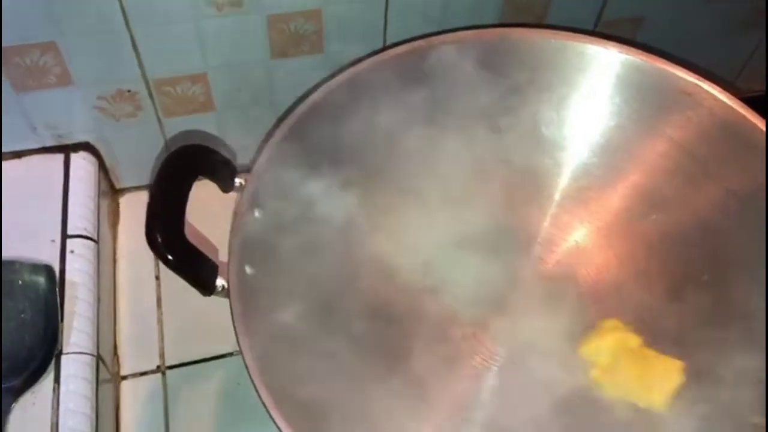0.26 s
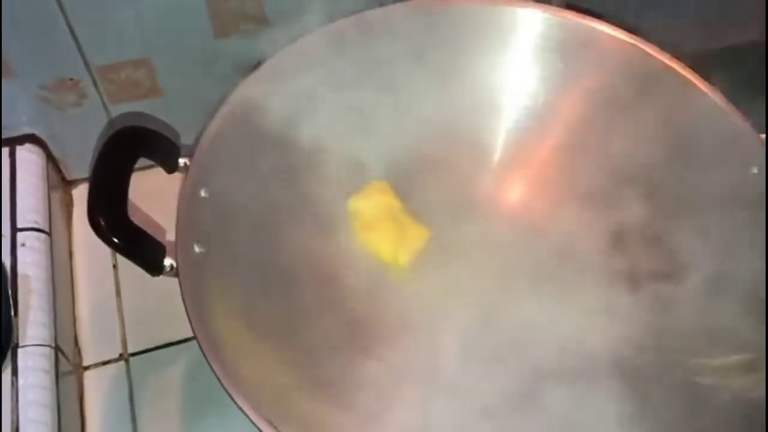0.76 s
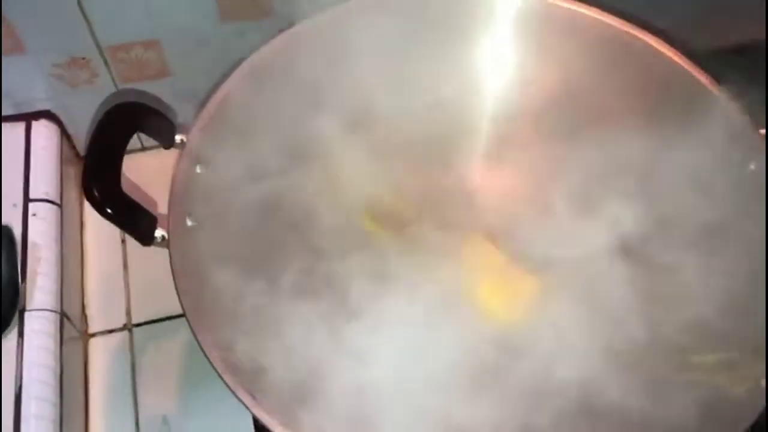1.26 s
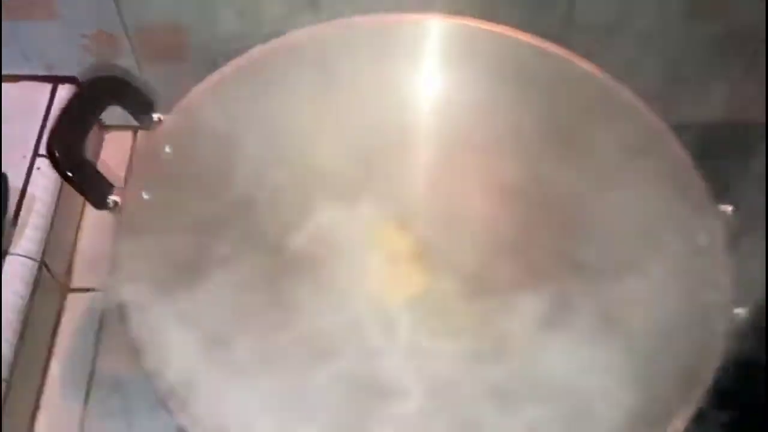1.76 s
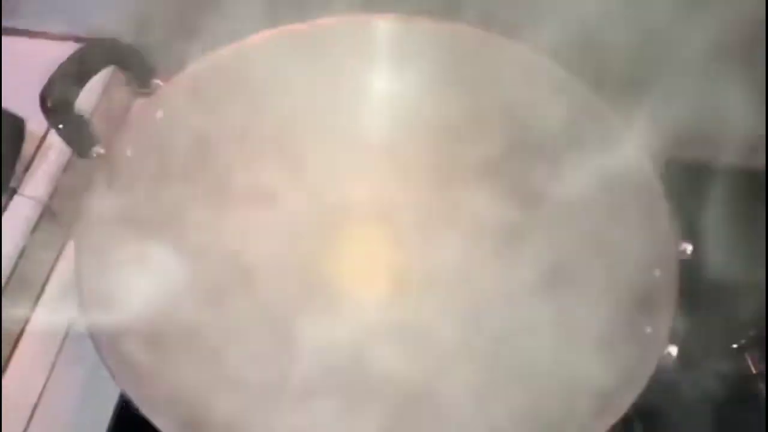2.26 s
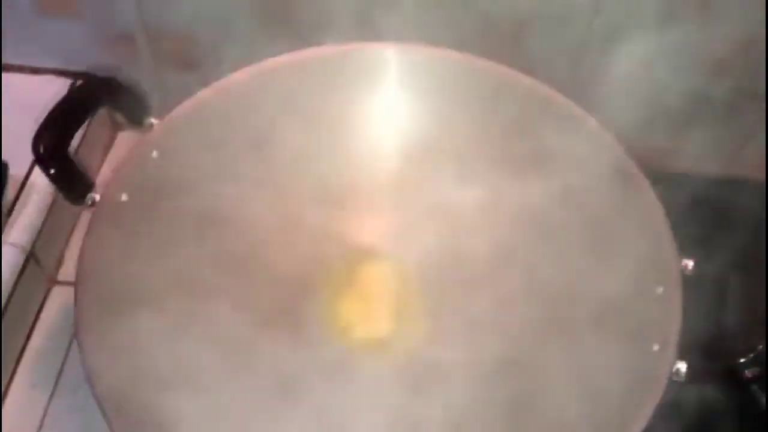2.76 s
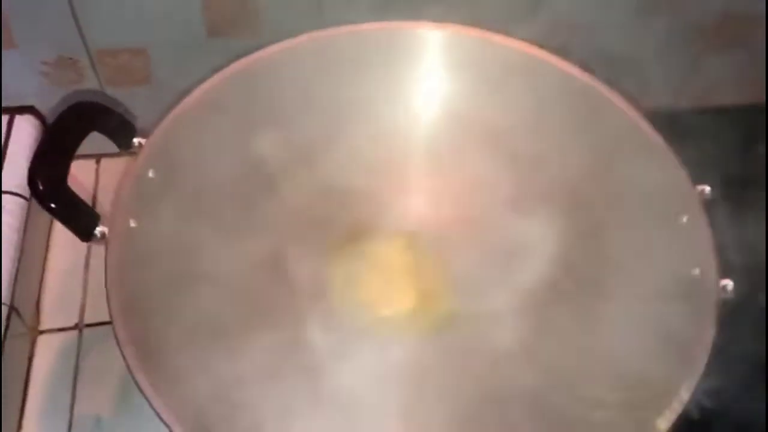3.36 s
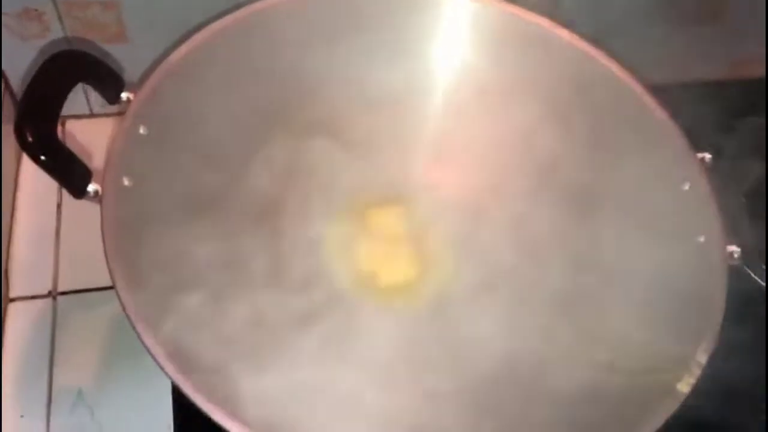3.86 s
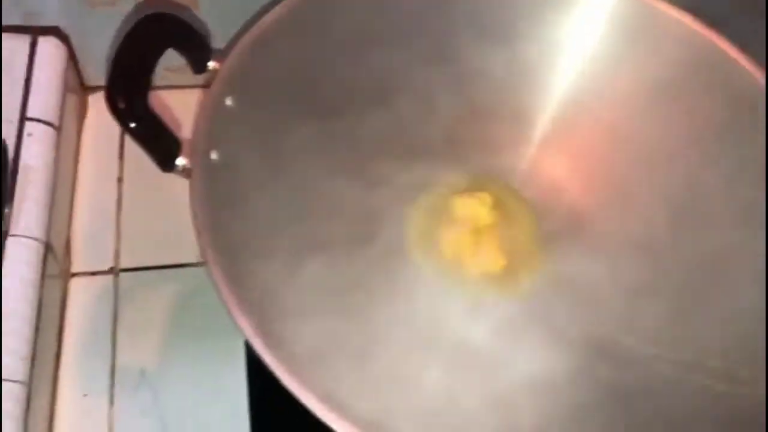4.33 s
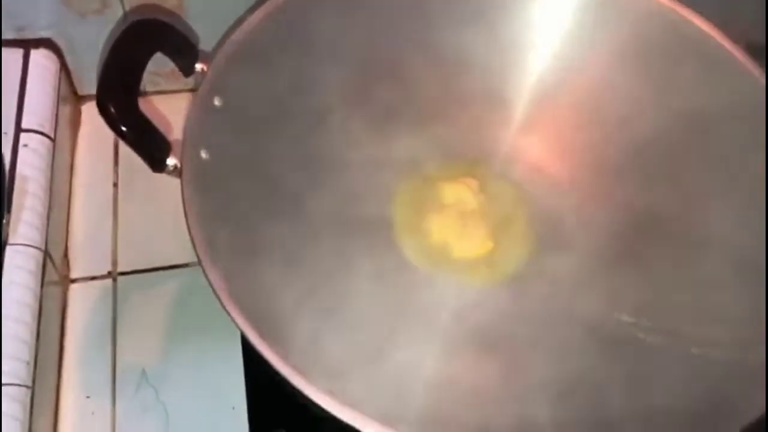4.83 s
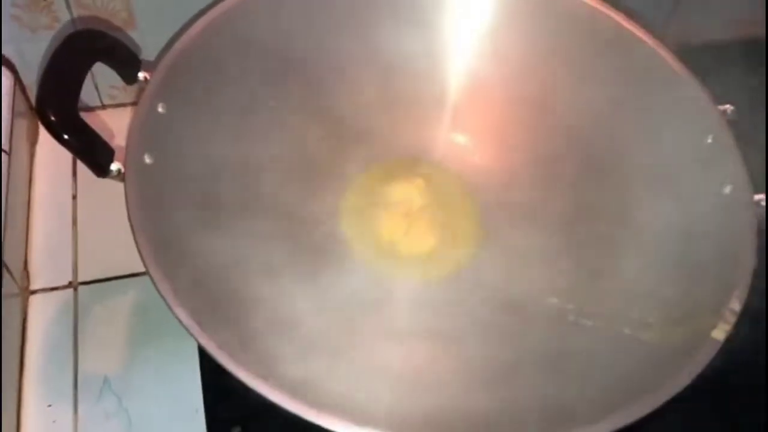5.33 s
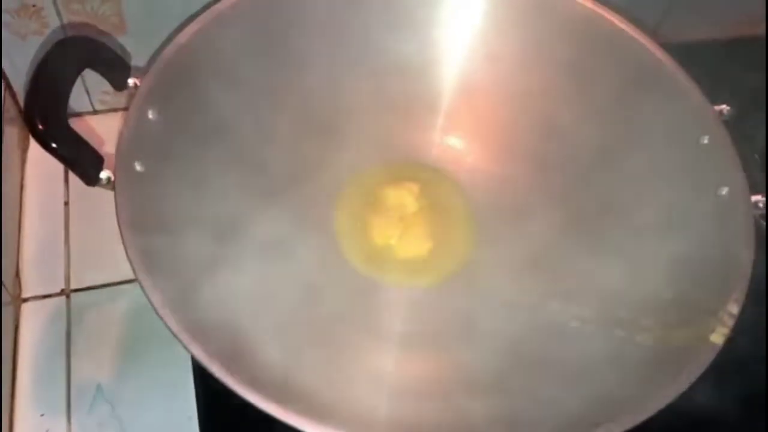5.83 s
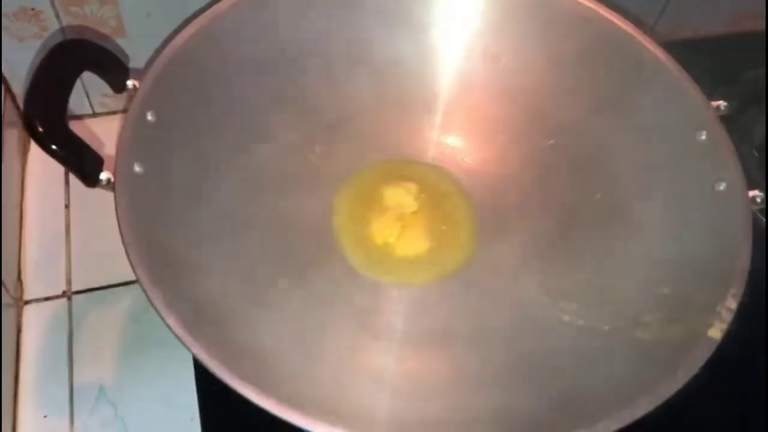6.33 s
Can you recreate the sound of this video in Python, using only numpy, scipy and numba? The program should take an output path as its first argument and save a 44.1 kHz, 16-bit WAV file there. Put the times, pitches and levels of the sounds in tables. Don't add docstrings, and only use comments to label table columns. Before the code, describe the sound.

A lump of butter hits a scorching steel wok and sizzles loudly at once, bright and dense with tiny steam bubbles. It slides with a fuller, lower sputter, then single droplets spit above it. Past two seconds the wok knocks once on its stand. The sizzle grows darker as the butter pools. A faint extractor hum sits underneath; close phone microphone, small tiled kitchen.

```python
import sys
import numpy as np
from scipy import signal
from scipy.fft import rfft, irfft
from scipy.io import wavfile
from scipy.ndimage import uniform_filter1d, map_coordinates
from numba import njit

SR = 44100
rng = np.random.default_rng(int(sys.argv[2]) if len(sys.argv) > 2 else 0)


def volts(x):
    e = np.asarray(x, float) / 20
    return 10 ** e


def dump_mix(stems):
    frames = np.atleast_2d(stems).T
    limited = np.clip(frames, -1, 1)
    pcm = np.round(limited * 32767).astype(np.int16)
    wavfile.write(sys.argv[1], SR, pcm)


N = 290844
TIME = np.arange(N) / SR

# pitch in Hz, level in dB, decay time t60 in seconds.
WOK_MODES = [(320, -15, .08), (420, -14, .08), (554, -11, .05), (728, -9, .04), (915, 1, .08),
             (1060, 0, .06), (1300, -7, .04), (1420, -2, .05), (1630, 0, .045), (1830, -2, .055),
             (2190, -5, .04)]


def level(x, db):
    return x * volts(db) / np.sqrt(np.mean(x ** 2))


def colour(x, points):
    hz, db = np.transpose(points)
    bins = np.maximum(np.arange(N // 2 + 1) * SR / N, 1)
    gain = volts(np.interp(np.log(bins), np.log(hz), db))
    return irfft(rfft(x) * gain, N)


def walk(rate):
    hold = int(SR / rate)
    steps = np.repeat(rng.standard_normal(N // hold + 1), hold)
    x = uniform_filter1d(uniform_filter1d(steps, hold), hold)[:N]
    return x / x.std()


def bell(x):
    return np.exp(-x ** 2)


@njit
def rings(start, hz, t60, glide, size, n):
    out = np.zeros(n)
    for k in range(len(start)):
        span = int(t60[k] * SR) + 2
        pole = np.exp(2j * np.pi * hz[k] / SR - np.log(1000) / span)
        turn = np.exp(2j * np.pi * hz[k] / SR * glide[k] / span)
        z = size[k] + 0j
        for i in range(start[k], min(start[k] + span, n)):
            out[i] += z.imag
            z *= pole
            pole *= turn
    return out


def boiling_db(s, hz):
    # time in seconds, vigour of boiling in dB, depth of the pool as dB of its fat bubbles.
    boil = [(0, -6, -3), (.1, -2.5, -2), (.26, -0.5, -1), (.5, -2, -3.5), (.75, 1.5, -6.5), (1.0, -1.5, -1),
            (1.45, 0.3, -4.5), (1.8, -1.5, -3.5), (2.55, 2.6, -4.5), (2.8, 0.65, 0), (3.2, 1.4, -0.8),
            (3.8, -1, 3.5), (4.0, 2.5, 0.5), (5.15, 0.8, 1.9), (5.5, 0, 1.5), (5.8, -1, 4.5),
            (6.15, 1.5, 2), (6.6, 0.6, 3)]
    # middle in seconds, length in seconds, pitch in Hz, level in dB.
    flares = [(0.03, 0.062, 5700, 4.5), (0.2, 0.11, 1690, 6.5), (0.376, 0.18, 6560, -4.5),
              (0.72, 0.072, 10500, 2), (0.902, .12, 6500, 2.5), (1.4, 0.33, 10600, 4),
              (1.75, 0.32, 4900, 3), (2.2, .25, 7500, -0.1), (2.5, .25, 1900, 1.5),
              (2.85, 0.65, 1570, -3.5), (2.517, 0.062, 2630, -8), (2.953, 0.074, 2600, 4.5),
              (3.1, 0.18, 10400, 1.5), (3.286, 0.073, 2760, 3.5), (3.486, 0.049, 2900, 2),
              (3.3, .08, 700, 8), (3.6, 0.29, 3900, -1), (3.72, .1, 1500, 4), (3.95, .12, 3180, 1.8),
              (4.7, .12, 1500, 3), (4.75, 0.19, 4500, 2.3), (5.05, 0.15, 6000, 3.5), (5.45, .15, 10300, -2),
              (5.9, 0.13, 7000, 4.5), (5.9, .7, 2120, -1.5), (6.3, 0.27, 3600, 1.5), (6.35, .25, 6200, 3.3),
              (6.55, 0.07, 10400, -4.2)]
    times, vigour_db, pool_db = np.transpose(boil)

    steady_hz, steady_share = 1500, 0.4
    follows = steady_share + (1 - steady_share) / (1 + (steady_hz / hz) ** 4)
    out = follows * np.interp(s, times, vigour_db)

    pool_hz = 3420
    pool_octaves = np.where(hz > pool_hz, 0.81, 0.66)
    out += np.interp(s, times, pool_db) * bell(np.log2(hz / pool_hz) / pool_octaves)

    landing_db, landing_s, landing_hz = -8, 0.06, 3000
    out += landing_db * np.exp(-s / landing_s) / (1 + (hz / landing_hz) ** 2)

    slide_db, slide_s, slide_span_s = 7.5, 1.3, 0.88
    slide_hz, slide_octaves = 580, 0.41
    sliding = bell(((s - slide_s) / slide_span_s) ** 2)
    out += slide_db * sliding * bell(np.log2(hz / slide_hz) / slide_octaves)

    for at, length, pitch_hz, db in flares:
        flare_octaves = np.log2(hz / pitch_hz)
        out += db * bell((s - at) / length) * bell(flare_octaves / 0.22)
    return out


def sizzle(cycles=12.4, scatter_db=1.4, patchy_db=1.23, glide=0.19):
    # pitch in Hz, level in dB per Hz.
    sizzle_tone = [(260, -32.5), (450, -31), (600, -23), (800, -21.5), (1040, -15.5), (1400, -13.5),
                   (1900, -9.5), (2530, -5), (3150, -3.5), (4320, -1), (6500, -3), (8500, -2), (11000, -1),
                   (11700, -3.5), (12400, -13.5)]
    bursts_per_s, sizzle_db = 75000, -18

    chance = rng.random((int(bursts_per_s * N / SR), 4)).T
    start = (chance[0] * N).astype(np.int64)
    hz = (18 + 95 * chance[1]) ** 2
    turns = cycles * 3 ** (2 * chance[2] - 1)

    patches = np.array([walk(rate) for rate in np.tile([12., 28.], 6)])
    patches -= uniform_filter1d(patches, int(.14 * SR), axis=1)
    patch_db = patchy_db * map_coordinates(patches, [11 * chance[1], start], order=1)
    burst_db = -scatter_db * np.log(chance[3] + 1e-9)

    weight = np.sqrt(hz ** 1.5 / turns)
    size = volts(boiling_db(start / SR, hz) + patch_db + burst_db) * weight
    foam = rings(start, hz, turns / hz, np.full(len(hz), glide), size, N)
    return level(colour(foam, sizzle_tone), sizzle_db)


def steel(x, ring_db=-15.5, width_hz=29.0):
    hz = np.arange(N // 2 + 1) * SR / N
    lift = sum(1 / (1 + ((hz - mode_hz) / width_hz) ** 2) for mode_hz, _, _ in WOK_MODES)
    return irfft(rfft(x) * (1 + volts(ring_db) * lift), N)


def hood():
    # pitch in Hz, level in dB per Hz.
    air_tone = [(21, -46), (40, -32), (58, -27), (85, -3.5), (105, -10.5), (130, -3.5), (160, -9),
                (210, -11), (322, -9), (463, -14.5), (566, -10.5), (700, -12.5), (910, -13), (1540, -94)]
    # pitch in Hz, level in dB, wobble in dB, wobbles per second, phase wander in units
    motor_lines = [
        (48.2, -65, 3.5, 3., .4),
        (146.7, -51.5, 1.8, 16., .1),
    ]

    draught_db = -46 - 0.51 * TIME + 0.24 * walk(3.84)
    air = level(colour(rng.standard_normal(N), air_tone), 0.3) * volts(draught_db)

    motor = np.zeros(N)
    for hz, db, wobble_db, rate, wander in motor_lines:
        loudness = np.sqrt(2) * volts(db + wobble_db * walk(rate))
        motor += loudness * np.sin(2 * np.pi * hz * TIME + 4 * wander * walk(2.23))
    return air + motor


def spits():
    # start in seconds, peak level in dB, pitch in Hz, length in cycles.
    droplets = [
        (1.0038, -9, 6000, 2.5),
        (1.9208, -13, 4000, 3),
        (3.3048, -9, 7000, 2.5),
        (3.4838, -12, 3200, 3),
        (3.9788, -8, 6000, 2.5),
        (4.0407, -2, 5000, 3),
        (5.1858, -9, 6500, 3),
        (5.5578, -9, 3800, 3),
        (6.2108, -5, 5000, 2.5),
    ]
    s, db, hz, cycles = np.transpose(droplets)
    pops = rings((s * SR).astype(np.int64), hz, 2 * cycles / hz, 0 * s, volts(db + 2.5), N)
    too_small_for_bass = signal.butter(2, 1200, "highpass", fs=SR, output="sos")
    return signal.sosfilt(too_small_for_bass, pops)


def knocks():
    # start in seconds, blow in dB, build-up in ms, tilt in dB per octave.
    contacts = [
        (2.296, -26.5, 5, -5),
        (2.352, -27, 0.89, 1),
        (2.36, -21.5, 0.28, 3.5),
        (2.365, -25, 2.3, -8.5),
        (2.372, -27.5, 2.1, 1),
    ]
    out = np.zeros(N)
    hz, mode_db, t60 = np.transpose(WOK_MODES)[:, :, None]
    for s, db, contact_ms, tilt_db in contacts:
        t = np.maximum(TIME - s, 0)
        share, phase = rng.standard_normal((2, len(hz), 1))
        blow_db = db + mode_db + tilt_db * np.log2(hz / 1000) + 1.5 * share
        modes = volts(blow_db - 60 * t / t60) * np.sin(2 * np.pi * hz * t + .8 * phase)
        build_up = 1 - np.exp(-(1000 * t / contact_ms) ** 2)
        out += modes.sum(axis=0) * build_up
    return out


def kitchen(x, count=14):
    t60_s, tail_db = 0.094, -11.5
    t = TIME[:int(.3 * SR)]
    place = np.arange(N) / N * (count - 1)
    out = x.copy()
    for k in range(count):
        tail = rng.standard_normal(len(t)) * volts(-60 * t / t60_s) * (t > .002)
        here = np.cos(np.pi / 2 * np.clip(place - k, -1, 1))
        out += volts(tail_db) * here * signal.oaconvolve(x, tail / np.linalg.norm(tail))[:N]
    return out


def scene():
    mono = kitchen(steel(sizzle()) + spits() + knocks()) + hood()
    return np.array([mono, mono])


def ragged_top(x, need_db=5.5):
    # pitch in Hz, share of frames kept from 0 to 1.
    top_kept = [(2500, 1), (4000, .99), (11400, .985), (11650, .85), (11800, .4), (11950, .17),
                (12080, .06), (12200, .015), (12300, 0)]
    hz, t, frames = signal.stft(x, SR, "cosine", 2048, 1024)
    budget = volts(need_db * uniform_filter1d(rng.standard_normal(len(t)), size=2))
    power = uniform_filter1d(np.abs(frames[0]) ** 2, size=4, axis=0)
    strength = power[np.arange(len(hz)) // 4 * 4] * budget
    strength /= uniform_filter1d(strength.mean(axis=0), size=12)
    rank = np.argsort(np.argsort(-strength, axis=1), axis=1) / len(t)
    kept = rank < np.interp(hz, *np.transpose(top_kept))[:, None]
    return signal.istft(frames * kept, SR, "cosine", 2048, 1024)[1][..., :N]


def side_puffs():
    # middle in seconds, low edge in Hz, high edge in Hz, level in dB.
    puffs = [
        (2.433, 9600, 11800, -24),
        (3.617, 9600, 11100, -26),
        (4.102, 6300, 7700, -27),
        (6.36, 7600, 9000, -26),
    ]
    side = np.zeros(N)
    for s, low_hz, high_hz, db in puffs:
        edges = [(low_hz - 20, -90), (low_hz, 0), (high_hz, 0), (high_hz + 20, -90)]
        band = colour(rng.standard_normal(N), edges)
        swell = np.cos(np.pi / 2 * np.clip((TIME - s) / 0.022, -1, 1)) ** 2
        side += level(band, db) * swell
    return side * np.array([[1], [-1]])


def low_pass(x):
    return signal.sosfilt(signal.butter(12, 12560, fs=SR, output="sos"), x)


def record(dry):
    bass_cut = signal.butter(2, 36, "highpass", fs=SR, output="sos")
    mic = signal.sosfilt(bass_cut, dry)
    return low_pass(ragged_top(mic) + side_puffs())


dry = scene()
out = record(dry)
dump_mix(out)
```